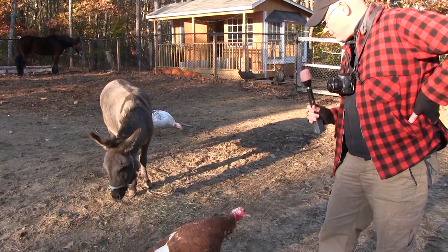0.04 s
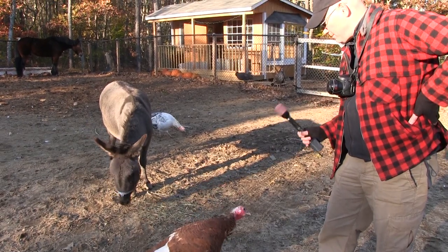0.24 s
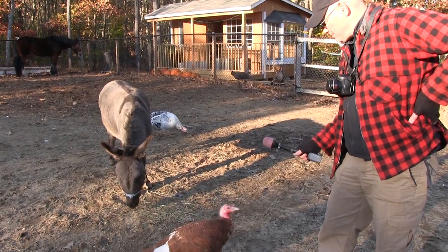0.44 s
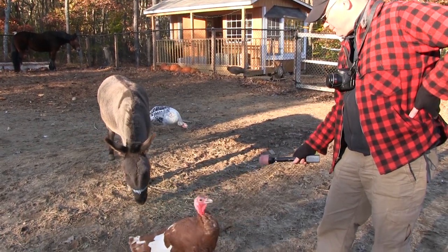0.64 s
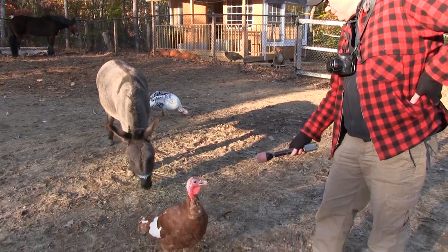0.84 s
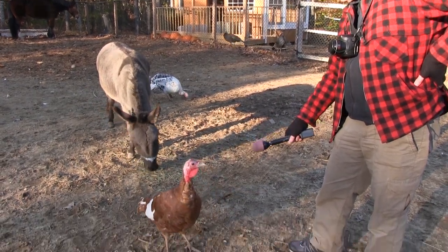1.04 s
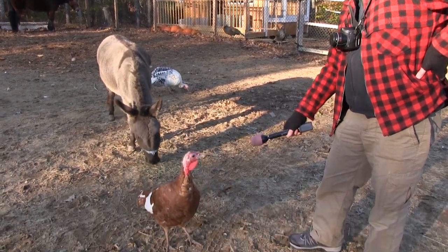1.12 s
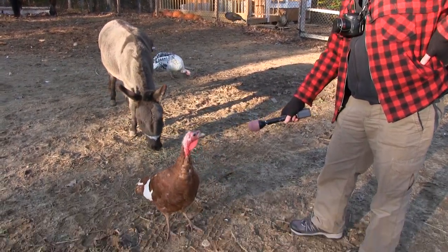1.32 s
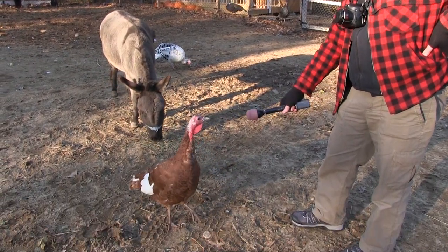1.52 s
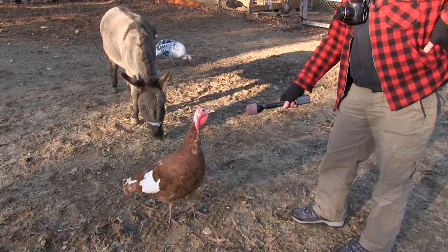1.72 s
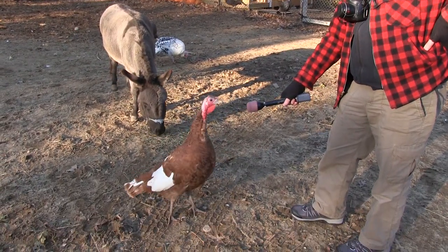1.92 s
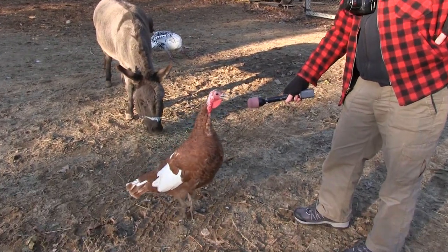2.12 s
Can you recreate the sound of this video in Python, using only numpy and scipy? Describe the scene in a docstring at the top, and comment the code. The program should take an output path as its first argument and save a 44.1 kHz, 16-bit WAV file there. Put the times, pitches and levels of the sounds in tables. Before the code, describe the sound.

A turkey calls close to the microphone in a quiet farmyard. Distant turkeys finish a rapid, falling, rattling gobble from 0 to 0.5 seconds, lightly echoing. The near bird yelps at 0.55, then louder and raspier at 0.85, while a thin far bird cry sounds between 0.65 and 0.95. A soft peep comes at 1.4, and a final cracking yelp at 1.9 to 2.2, over faint air and low hum.

```python
"""Turkey calling in a farmyard

A near turkey gives three loud yelps that break between registers, and a soft peep before the last.
Far turkeys finish a rattling gobble; a thin, distant bird cry sounds from the first yelp into the second.
Birds are harmonic series weighted by throat resonances; the near bird adds turbulent air and ringing.
Shaped noise gives the outdoor air and tiny ticks, slow modulation a wavering hum, random echoes the yard.
"""
import sys
import numpy as np
from scipy import signal
from scipy.fft import rfft, irfft
from scipy.io import wavfile

SR = 44100
rng = np.random.default_rng(int(sys.argv[2]) if len(sys.argv) > 2 else 0)


def wav_record(signal):
    """Record a signal, one row per channel, as 16-bit PCM in the file named by sys.argv[1]."""
    frames = np.transpose(np.atleast_2d(signal))
    bounded = np.clip(frames, -1, 1)
    # unit amplitude maps onto the largest positive 16-bit level
    quanta = np.round(bounded * 32767).astype(np.int16)
    wavfile.write(sys.argv[1], SR, quanta)


N = 96049  # samples in the scene
EDGE_HZ = 13600  # upper limit of the voices and of the recorder


def amp(db):
    """Logarithmic level: decibels to amplitude gain."""
    return 10 ** (np.asarray(db) / 20)


def evened(x):
    """Power normalization: scales to rms 1."""
    return x / np.sqrt(np.mean(x ** 2) + 1e-20)


def read(points, hz):
    """Spectral envelope: interpolates a table on a log-frequency axis."""
    frequency, value = np.transpose(points)
    return np.interp(np.log(hz + 1), np.log(frequency + 1), value)


def curves(rows):
    """Linear interpolation: the start time, then every other column sample by sample."""
    time, *columns = np.transpose(rows)
    t = np.arange(time[0], time[-1], 1 / SR)
    return time[0], [np.interp(t, time, column) for column in columns]


def add(mix, start, sound):
    """Superposition: sums a sound into the mix from its start time in seconds."""
    part = mix[max(round(start * SR), 0):][:len(sound)]
    part += sound[:len(part)]


def noise(spectrum):
    """Spectral shaping: filters white noise to the given spectrum, at rms 1."""
    gain = amp(read(spectrum, np.fft.rfftfreq(N, 1 / SR)))
    return evened(irfft(rfft(rng.standard_normal(N)) * gain, N))


def wander(hz):
    """Low-pass filtering: random motion of rms 1, mostly slower than hz."""
    rolloff = 1 + (np.fft.rfftfreq(N, 1 / SR) / hz) ** 4
    return evened(irfft(rfft(rng.standard_normal(N)) / rolloff, N))


# Source spectrum of the syrinx: harmonic_number, level_db
SYRINX_HARMONICS = [(1, 3), (2, -6.5), (3, -18), (4, -27), (5, -39.5), (7, -35.5), (12, -36)]
JITTER, SHIMMER, FLUTTER_HZ = .06, .8, 463  # rms pitch and strength fractions at full roughness; rate


def voice(hz, rough, throat, overtones_db=0, harmonics=SYRINX_HARMONICS):
    """Source-filter principle: syrinx harmonics weighted by the throat, unsteady when rough."""
    n = len(hz)
    unsteady_hz = hz * (1 + JITTER * rough * wander(FLUTTER_HZ)[:n])
    phase = 2 * np.pi * np.cumsum(unsteady_hz) / SR
    k = np.arange(1, 13)[:, None]
    level_db = read(harmonics, k) + read(throat, k * hz) + overtones_db * (k > 1)
    weight = amp(level_db) * (k * hz < EDGE_HZ)
    # Dividing by the summed power leaves the throat to set colour, not loudness.
    tone = (weight * -np.cos(k * phase)).sum(0) / np.sqrt((weight ** 2).sum(0) / 2)
    return tone * (1 + SHIMMER * rough * wander(FLUTTER_HZ)[:n])


# Decay of the yard's echoes: frequency_hz, t60_s
YARD_DECAY = [(200, .7), (900, 0.97), (2000, .7), (4000, 0.69), (6000, .22), (14000, 0.21)]


def yard(x):
    """Scattering: sparse echoes from fences, sheds and trees, the treble dying first."""
    echoes_per_s, first_echo_s = 2000, .008
    taps = rng.standard_normal(SR) * (rng.random(SR) < echoes_per_s / SR)
    taps *= np.arange(SR) > first_echo_s * SR
    hz, t, spectra = signal.stft(taps, SR, nperseg=256)
    decay = amp(-60 * t / read(YARD_DECAY, hz)[:, None])
    tail = signal.istft(spectra * decay, SR, nperseg=256)[1]
    return signal.fftconvolve(x, tail / np.linalg.norm(tail))[:N]


# Spectrum of the outdoor air: frequency_hz, relative_level_db
AIR_SPECTRUM = [(20, -9), (55, -2), (90, -3), (200, -5), (320, -9.5), (600, -14.5), (900, -15),
                (1400, -18.5), (2200, -25), (3600, -26.5), (5000, -29), (13000, -30.5)]
AIR_DB = -64.5
# Hum of far machinery: frequency_hz, width_hz, level_db
MACHINE_HUM = [(114.6, 60, -74), (208, 15, -78.5)]


def background():
    """Broadband noise and narrowband modulation: still outdoor air and a faint wavering hum."""
    t = np.arange(N) / SR
    hum = np.zeros(N)
    for hz, width, db in MACHINE_HUM:
        hum += amp(db) * evened(wander(width / 2) * np.cos(2 * np.pi * hz * t))
    return amp(AIR_DB) * noise(AIR_SPECTRUM) + hum


# Course of the thin far cry: time_s, pitch_hz, level_db
CRY_COURSE = [(.64, 820, -71), (.68, 845, -64.5), (.725, 854, -65.5), (.745, 846, -56.5), (.785, 846, -59),
              (.806, 870, -57), (.816, 931, -57.5), (.85, 929.5, -62.5), (.92, 940, -63), (.95, 923.5, -64)]
# Spectral colour of the far cry: frequency_hz, relative_level_db
CRY_SPECTRUM = [(850, 2.5), (1850, -0.5), (2800, -3), (3500, -9.5), (4270, 4.5), (4700, -12.5), (5100, -19),
                (5900, -4.5), (6800, -13.5), (8500, -16.5), (9300, -6.5), (10500, -29.5)]
CRY_WET_DB = -7  # echo relative to the direct cry


def far_cry(rough=0.073):
    """Harmonic synthesis: a thin held note steps up once, with nearly equal source harmonics."""
    out = np.zeros(N)
    start, (hz, db) = curves(CRY_COURSE)
    add(out, start, amp(db) * voice(hz, rough, CRY_SPECTRUM, harmonics=[(1, 0), (12, -1)]))
    return out + amp(CRY_WET_DB) * yard(out)


# Syllables of the leading far gobbler: start_s, length_s, first_pitch_hz, last_pitch_hz, level_db
LEAD_SYLLABLES = [(0, 0.076, 1049, 1022, -47), (.064, 0.033, 1046, 710, -53.5),
                  (0.117, 0.033, 1020, 995, -66.5), (0.131, 0.038, 1060, 1016, -52),
                  (0.166, 0.028, 834, 797, -54), (0.185, 0.018, 1103, 947, -49.5),
                  (0.213, 0.014, 1070, 981, -42.5), (0.237, 0.014, 1062, 996, -45),
                  (0.27, 0.012, 1044, 980, -50), (0.297, 0.02, 1037, 978, -51)]
# Throat of the leading gobbler: frequency_hz, relative_level_db
LEAD_THROAT = [(600, -18.5), (850, -6), (1030, -7), (1250, 3), (1600, 14.5), (2050, 8), (2450, 24.5),
               (3100, 28.5), (3600, 7.5), (4200, 4.5), (4700, 11), (5300, 12.5), (6100, 14), (7200, 6.5),
               (9000, -13), (12000, 5)]
# Course of the flock joining in: time_s, pitch_hz, level_db
FLOCK_COURSE = [(0, 990.6, -52), (.11, 969.4, -64), (.18, 943.6, -56.5), (.31, 916.7, -55.5),
                (.39, 842, -55.5), (.47, 836, -60.5), (.54, 787, -71)]
# Throat of the flock: frequency_hz, relative_level_db
FLOCK_RESONANCES = [(600, -26.5), (850, -6), (1020, 3), (1250, -15), (1620, 2.5), (1900, 6.5), (2400, 25.5),
                    (2750, 8), (3100, 21.5), (3600, 9.5), (4200, 16), (4700, 27.5), (5300, 15.5),
                    (6100, 29.5), (7200, 18.5), (8500, 9), (12000, 2.5)]
WARBLE_HZ, WARBLE_SWING, WARBLE_DEPTH = 32, .08, 0.45  # mean rate; pitch and strength fractions
LEAD_ROUGH, FLOCK_ROUGH = 0.1, .18  # roughness, 0-1
LEAD_WET_DB, FLOCK_WET_DB = -7.5, -5  # echo re direct sound; the leader is nearer than the flock


def far_gobble(count=2):
    """Pitch and amplitude modulation: one leads in falling syllables, others warble at their own pace."""
    lead, flock = np.zeros((2, N))
    for start, length, first_hz, last_hz, db in LEAD_SYLLABLES:
        progress = np.linspace(0, 1, round(length * SR))
        swell = np.sqrt(abs(np.sin(np.pi * progress)))
        pitch = first_hz + (last_hz - first_hz) * progress
        add(lead, start, amp(db) * swell * voice(pitch, LEAD_ROUGH, LEAD_THROAT))
    start, (hz, db) = curves(FLOCK_COURSE)
    n = len(hz)
    for _ in range(count):
        warble_hz = WARBLE_HZ * (1 + 0.13 * wander(12)[:n])
        beat = 2 * np.pi * (rng.random() + np.cumsum(warble_hz) / SR)
        pitch = hz * (1 + WARBLE_SWING * np.cos(beat) + 0.051 * wander(25)[:n])
        throb = 1 + WARBLE_DEPTH * np.sin(beat)
        bird = voice(pitch, FLOCK_ROUGH, FLOCK_RESONANCES)
        add(flock, start, amp(db) * throb * bird / np.sqrt(count))
    return lead + flock + yard(amp(LEAD_WET_DB) * lead + amp(FLOCK_WET_DB) * flock)


# Faint dry ticks, perhaps the beak: start_s, level_db
TICK_TIMES = [(.961, -51.5), (1.954, -61.5)]
# Spectrum of a tick: frequency_hz, relative_level_db
TICK_SPECTRUM = [(2000, -18.5), (4500, -2), (7000, -4), (11000, 1.5), (13000, -9)]
TICK_S = 0.0014  # decay time constant


def ticks():
    """Exponential decay: tiny bright noise snaps during the second and last yelps."""
    out, t = np.zeros(N), np.arange(SR // 100) / SR
    for start, db in TICK_TIMES:
        add(out, start, amp(db) * np.exp(-t / TICK_S) * noise(TICK_SPECTRUM)[:len(t)])
    return out


# The near bird's yelp, yelp, peep and yelp, one list per call:
# time_s, pitch_hz, level_db, roughness (0-1), overtones_db
NEAR_CALLS = [
    [(.542, 628, -54, .3, -16), (.547, 820, -31.5, 0, -8.5), (.553, 1006, -34.5, 0.12, 6),
     (.556, 1439, -38, .2, 8.5), (.562, 1507, -34, 0, 6), (.571, 1596, -58, 0.04, 15),
     (.574, 2337, -62, .02, 11), (.586, 2469, -62.5, 0.1, 33), (.597, 2324, -52.5, 0.1, 17.5),
     (.612, 1749, -51.5, 0.14, 14.5), (.617, 1398, -30.5, .06, 8.5), (.626, 1394, -29, 0.1, 5),
     (.644, 1126, -37.5, 0.07, -6.5), (.654, 1171, -36, 0, -1), (.668, 1098, -37, 0.1, -19),
     (.678, 859, -37.5, 0.11, -3.5), (.694, 827, -25, 0.07, 2.5), (.711, 788, -35, 0.1, -6),
     (.724, 700, -28.5, 0.1, 3), (.742, 768, -34.5, 0.13, -7), (.753, 709.6, -28.5, 0, 3),
     (.768, 648, -37, 0.1, -1), (.79, 543, -54.5, 0.2, -1.5)],
    [(.844, 592, -50, 1, -3), (.851, 922.5, -31.5, .6, 4.5), (.858, 1161, -15.5, 0.25, 9.5),
     (.866, 1429, -25.5, .3, 7), (.870, 1940, -22, 0, -9), (.876, 2384, -31, 0.35, 6),
     (.892, 2701, -43, 0.3, -4), (.901, 2409, -38, 0.29, 9), (.906, 2164, -39, 0.25, -8.5),
     (.912, 1665, -22.5, 0.1, -14.5), (.922, 1695, -20, 0.03, 2.5), (.927, 1408, -30.5, 0.08, -1.5),
     (.931, 1295, -24, 0.1, 5), (.943, 1199, -30, 0.05, 1.5), (.952, 1009, -38, 0.16, 2.5),
     (.958, 792, -29.5, 0, 2), (.964, 659, -40, 0.38, -7), (.974, 558, -68.5, .3, 3)],
    [(1.39, 727, -62.5, 0.2, -17.5), (1.397, 866, -57, .1, -23.5), (1.414, 1212, -64.5, 0.14, 0),
     (1.43, 1275, -62, 0.14, 0.5), (1.448, 1187, -58, .05, 0), (1.472, 1255, -54.5, 0.14, -1),
     (1.492, 1342, -64.5, .05, -0.5), (1.499, 1366, -79.5, .05, -1.5)],
    [(1.905, 687, -54, 0.07, -21), (1.913, 772.6, -31.5, 0.1, -15), (1.918, 863, -32.5, 0, -28.5),
     (1.922, 1078, -31.5, 0, -8), (1.934, 1198, -31, 0.05, -5.5), (1.947, 1305, -36.5, 0.08, -9),
     (1.953, 1431, -62.5, 0.2, -5), (1.971, 1695, -61.5, 0.15, -5), (1.977, 1664, -29.5, 0, 4.5),
     (1.982, 1573, -28, 0.1, -5), (1.988, 1574, -24, 0, -4.5), (1.993, 1366, -32.5, 0.15, -2.5),
     (1.996, 1250, -28.5, 0, 1.5), (2.003, 1199, -29.5, 0.1, 1.5), (2.026, 1184, -31.5, .02, -1),
     (2.053, 991, -35, 0.1, -4), (2.066, 1052, -34.5, .04, 2), (2.078, 982, -34, .02, -5),
     (2.091, 1062, -32.5, 0.05, -3), (2.1, 1001, -32.5, 0, 1), (2.109, 1150, -29.5, 0.07, -2.5),
     (2.122, 1002, -34.5, 0, 3.5), (2.132, 1031, -32, 0, -10), (2.14, 860, -31.5, 0.17, -6.5),
     (2.153, 894.3, -28.5, 0, -11), (2.162, 724, -26, 0.06, 3.5), (2.168, 709, -30, 0.05, -3),
     (2.18, 706, -27, 0, 1)],
]
# Fixed resonances of the near throat: frequency_hz, relative_level_db
NEAR_THROAT = [(500, -14), (720, -10), (860, -8), (1050, -2), (1250, 3), (1430, 8), (1660, 13), (1850, 2),
               (2080, -5), (2400, 3), (2800, 4), (3150, -2), (3700, -2), (4200, 0), (4900, -12),
               (5500, -27), (7000, -22), (9500, -26), (13000, -38)]
# Spectrum of the turbulent air: frequency_hz, relative_level_db
RASP_SPECTRUM = [(200, -22.5), (500, -29.5), (900, -11), (1700, 0.5), (2600, 0.5), (4000, -11.5),
                 (5000, -13), (5800, -22), (8000, -18), (11000, -32), (13000, -46.5)]
# Spectrum of the low push of air with each call: frequency_hz, relative_level_db
PUFF_SPECTRUM = [(10, -7), (30, 6), (55, -16), (110, -23.5), (250, -37), (600, -65.5)]
# Resonances that ring on with the calls: frequency_hz, width_hz, level_db
CALL_RINGS = [(850, 5.7, -10.5), (1390, 23, -22), (1560, 27, -29)]
RASP_DB, PUFF_DB = -4, -27.5  # relative to the call's level; rasp at full roughness
ATTACK_S, NEAR_WET_DB = 0.00067, -42  # onset time; echo relative to the direct calls


def near_turkey():
    """Source-filter voice with turbulence: gliding tones, rasp where rough, a soft push of air."""
    out = np.zeros(N)
    for rows in NEAR_CALLS:
        start, (hz, db, rough, overtones_db) = curves(rows)
        n, rough = len(hz), np.clip(rough, 0, 1)
        rasp = amp(RASP_DB) * rough ** 1.02 * noise(RASP_SPECTRUM)[:n]
        puff = amp(PUFF_DB) * noise(PUFF_SPECTRUM)[:n]
        attack = np.minimum(np.arange(n) / (ATTACK_S * SR), 1)
        tone = voice(hz, rough, NEAR_THROAT, overtones_db)
        add(out, start, amp(db) * attack * (tone + rasp + puff))
    ring = np.zeros(N)
    for hz, width, db in CALL_RINGS:
        ring += amp(db) * signal.lfilter(*signal.iirpeak(hz, hz / width, SR), out)
    return out + ring + amp(NEAR_WET_DB) * yard(out)


def scene():
    """Superposition: all sources sum at one microphone."""
    return (background() + far_cry() + far_gobble() + ticks() + near_turkey())[None]


def record(dry):
    """Band limitation: a linear-phase low-pass sets the recorder's upper edge."""
    lowpass = signal.firwin(511, EDGE_HZ, window=("kaiser", 9), fs=SR)
    return signal.oaconvolve(dry, lowpass[None], "same")


dry = scene()
out = record(dry)
wav_record(out)
```